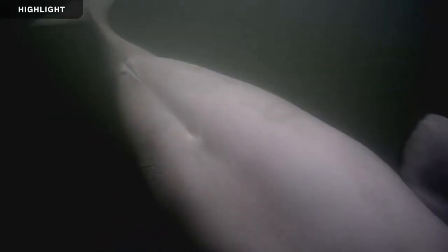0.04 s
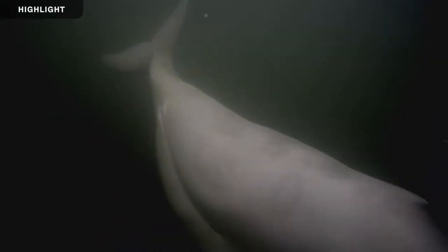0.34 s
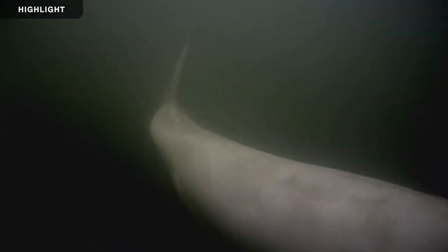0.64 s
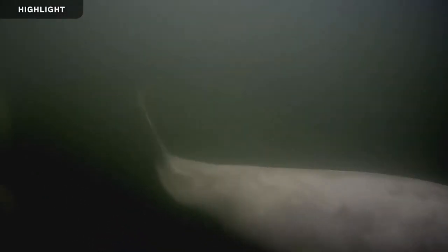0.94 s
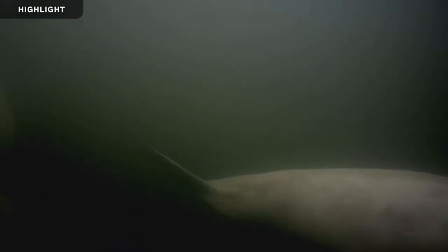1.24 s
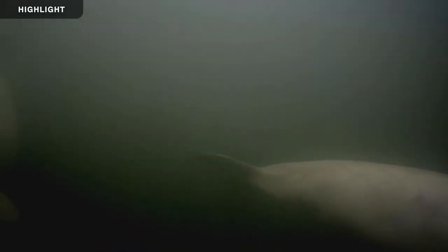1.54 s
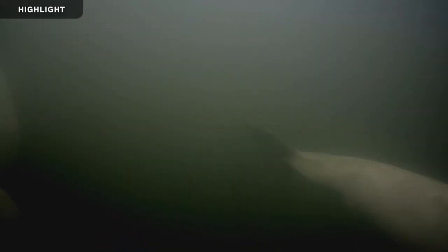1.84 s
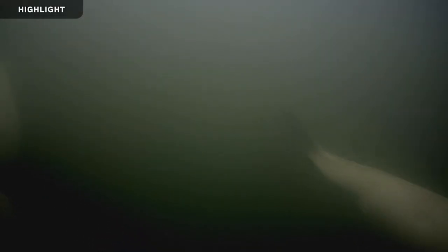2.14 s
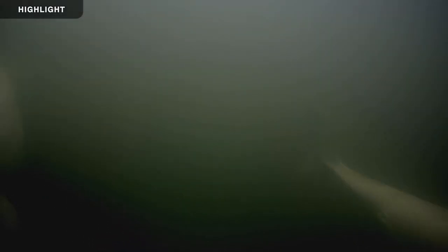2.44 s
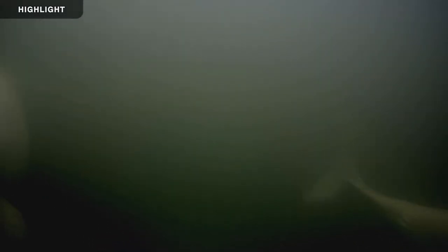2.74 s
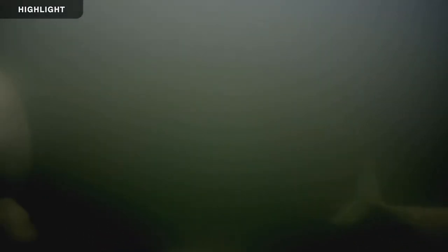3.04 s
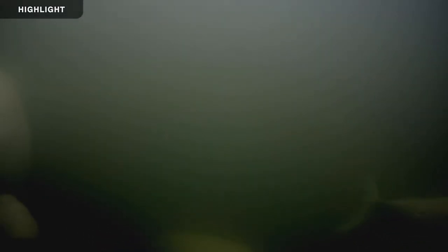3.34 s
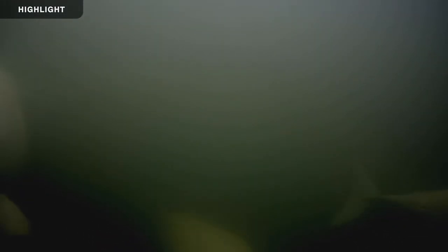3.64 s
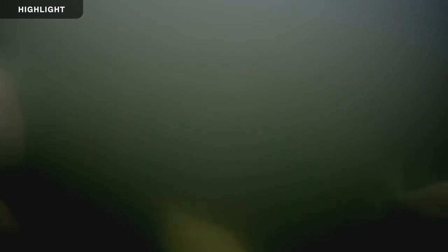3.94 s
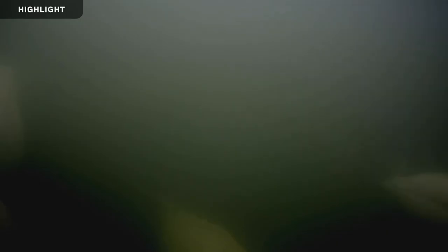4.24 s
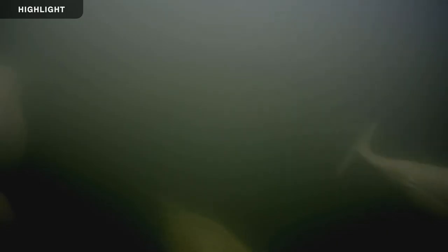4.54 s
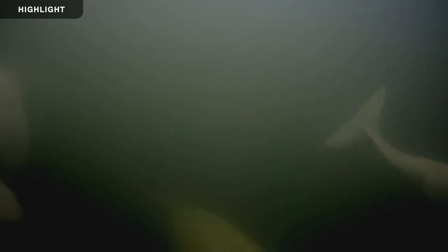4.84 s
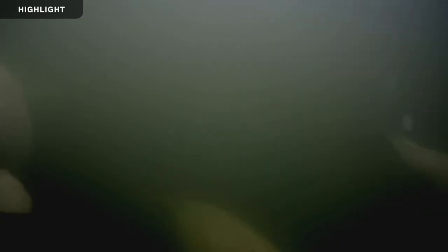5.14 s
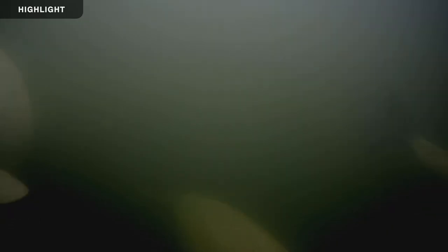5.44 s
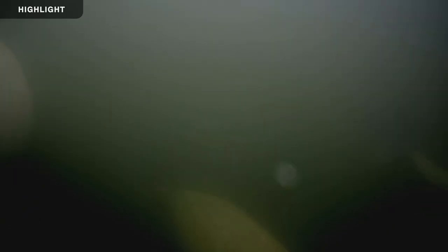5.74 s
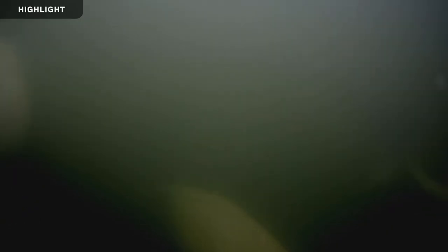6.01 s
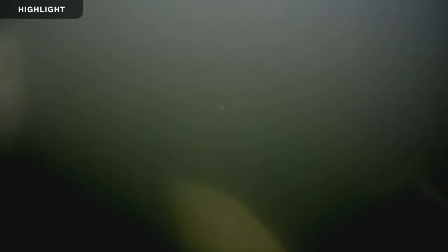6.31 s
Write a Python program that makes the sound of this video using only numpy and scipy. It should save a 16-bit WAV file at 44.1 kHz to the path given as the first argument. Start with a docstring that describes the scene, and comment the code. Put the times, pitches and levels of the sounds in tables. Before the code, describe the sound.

Several beluga whales whistle over one another through an underwater microphone, with a slight echo. A high warbling note slowly sinks while lower calls glide downward, then give way to faint creaking, a fast clicking buzz, a rising call and a short rasp. Closer and louder throughout, water rumbles past the microphone, with surges of bubbles and single plops leaning left, over a faint hiss.

```python
"""Under water among belugas, heard through a narrow-band hydrophone. Several whales call at once:
vibrating nasal lips make gliding whistles, fast clicks merge into buzzes and creaks, and hoarse
rasps and squeaks fall in between, all with a surface echo and a faint tail. Close by and louder,
water rumbles past the housing and sloshes in swarms of ringing bubbles, mostly on the left.
Large bubbles glug and tiny ones pip, over a soft hiss and a thin whine."""
import sys
import numpy as np
from scipy import signal
from scipy.fft import rfft, irfft, next_fast_len
from scipy.io import wavfile
from scipy.ndimage import uniform_filter1d

SR = 44100
rng = np.random.default_rng(int(sys.argv[2]) if len(sys.argv) > 2 else 0)


def transcribe(u):
    """Save the signal u as a 16-bit wav file named by the first command-line argument.

    u: samples, shape (n,) or (channels, n), limited to [-1, 1]; the rate is SR.
    q: integer samples, one column per channel.
    """
    v = np.clip(np.atleast_2d(u).T, -1, 1)
    q = np.round(v * 32767).astype(np.int16)
    wavfile.write(sys.argv[1], SR, q)


N = 289727
TIME = np.arange(N) / SR
CONVERTER_HZ = 16000  # the hydrophone's sample rate


def undb(db):
    """Decibels to gain."""
    return 10 ** (np.asarray(db) / 20)


def unit(x):
    """Scale to rms 1."""
    return x / np.sqrt(np.mean(x ** 2))


def curves(rows):
    """The columns of a table, joined by straight lines in time."""
    times, *columns = np.transpose(rows)
    return [np.interp(TIME, times, column) for column in columns]


def gate(rows, fade_s=0.0053):
    """Open from the first row of a table to the last, with soft edges."""
    return np.clip(np.minimum(TIME - rows[0][0], rows[-1][0] - TIME) / fade_s + 1, 0, 1)


def colour(x, points):
    """Shape with an EQ curve of (Hz, dB) points; rms 1."""
    size = next_fast_len(N)
    hz, db = np.transpose(points)
    bins = np.maximum(np.fft.rfftfreq(size, 1 / SR), 1)
    gain = undb(np.interp(np.log(bins), np.log(hz), db))
    return unit(irfft(rfft(x, size) * gain, size)[..., :N])


def filtered(x, order, hz, kind="low"):
    """Low-pass or high-pass filter."""
    return signal.sosfilt(signal.butter(order, hz, kind, fs=SR, output="sos"), x)


def wander(rate):
    """Smooth random motion that changes about `rate` times a second; rms 1."""
    hold = max(int(SR / rate), 1)
    steps = np.repeat(rng.standard_normal(N // hold + 1), hold)
    return unit(uniform_filter1d(steps, hold)[:N])


def phase_of(hz):
    """Phase in radians of a moving frequency."""
    return 2 * np.pi * np.cumsum(hz) / SR


def hoarse(phase, width_hz):
    """A tone broken up into a band of noise."""
    return unit(wander(width_hz) * np.sin(phase) + wander(width_hz) * np.cos(phase))


def decay(t, t60):
    """A fade that falls 60 dB in t60 seconds."""
    return np.exp(-np.log(1000) * t / t60)


def bubble(hz, t60, glide=0.19):
    """One bubble rings: a dying sine whose pitch climbs a little."""
    t = np.arange(int(t60 * SR)) / SR
    return np.sin(phase_of(hz * (1 + glide * t / t60))) * decay(t, t60)


def add(out, start_s, sound):
    """Mix a sound in at its start time."""
    start = max(int(start_s * SR), 0)
    part = sound[..., :max(N - start, 0)]
    out[..., start:start + part.shape[-1]] += part


# Fader ride of the hiss. Each row: time in seconds, level in dB.
HISS_LEVEL = [(0, -67.5), (1.2, -74.5), (2, -66), (3.8, -72.5)]
# Tone of the hiss. Each row: frequency in Hz, relative level in dB.
HISS_EQ = [(900, -2.5), (2100, -1.5), (3200, -7), (4000, -5.5), (6300, -7), (15000, -16)]


def noise_floor(whine_hz=3741, whine_db=-89):
    """A soft, flickering hiss that swells and fades with the calls, and a thin whine."""
    hiss = colour(rng.standard_normal(N), HISS_EQ) * undb(curves(HISS_LEVEL)[0] + wander(22))
    whine = hoarse(2 * np.pi * whine_hz * TIME, width_hz=20) * undb(whine_db)
    return hiss + whine


# Fader ride of the rumble. Each row: time in seconds, level in dB.
RUMBLE_LEVEL = [(0, -36.5), (1.1, -34), (2.2, -36.5), (3.48, -37), (3.56, -31), (4.5, -34), (6.25, -35.5),
                (6.5, -32.5)]
# Tone of the rumble. Each row: frequency in Hz, relative level in dB.
RUMBLE_EQ = [(8, 3), (85, 1), (170, -8.5), (320, -31.5), (900, -45), (1700, -78)]


def rumble(crossover_hz=170, apart_db=-9, surge_db=2.0, lean_db=1):
    """Water flows round the housing: long waves press on both sides alike, short ones unevenly."""
    shared = filtered(colour(rng.standard_normal(N), RUMBLE_EQ), 2, crossover_hz)
    apart = colour(rng.standard_normal((2, N)), RUMBLE_EQ)
    eddies = filtered(apart, 2, crossover_hz, "high")[::-1]  # left and right swapped
    lean_left = undb([[lean_db / 2], [-lean_db / 2]])
    sides = (shared + undb(apart_db) * apart + eddies) * lean_left
    return sides * undb(curves(RUMBLE_LEVEL)[0] + surge_db * wander(9))


# Tone of the bubble swarm. Each row: frequency in Hz, relative gain in dB.
SWARM_EQ = [(90, -8.5), (220, -5.5), (700, -7), (1200, -13), (1650, 5)]


def swarm(count=2400, low_hz=170, high_hz=1200, cycles=20, spread_db=2.9):
    """Many small bubbles, mostly weak with a few that stand out, each ringing for a few cycles."""
    out = np.zeros(N)
    for when, pitch, weakness in rng.random((count, 3)):
        hz = low_hz * (high_hz / low_hz) ** pitch
        gain = undb(-spread_db * np.log(weakness + 0.0035))
        add(out, when * N / SR, gain * bubble(hz, cycles / hz))
    return colour(out, SWARM_EQ)


# Surges of bubbles. Each row: start in seconds, length in seconds, level in dB before panning.
SURGES = [(0.959, 0.24, -40.5), (1.336, 0.38, -44.5), (1.614, 0.018, -48.5), (2.392, 0.19, -41.5),
          (2.694, 0.34, -45), (3.113, 0.23, -41.5), (3.791, 0.31, -41), (4.137, 0.13, -37),
          (5.71, 0.28, -47.5)]


def slosh(calm_db=-52.5, attack_s=0.046, release_s=0.11, left_db=4, right_db=-5, muffle_hz=1280):
    """Bubbles churn against the housing, mostly on the left; each surge swells, holds and ebbs."""
    power = undb(calm_db) ** 2
    for start, length, db in SURGES:
        swell = np.clip((TIME - start) / attack_s, 0, 1)
        ebb = np.exp(-np.maximum(TIME - start - length, 0) / release_s)
        power = power + (undb(db) * swell * ebb) ** 2
    sides = np.array([swarm() * undb(left_db), swarm() * undb(right_db)])
    return filtered(sides * np.sqrt(power), 10, muffle_hz)


# Large bubbles. Each row: start in seconds, pitch in Hz, level in dB, side of the housing.
GLUGS = [(0.587, 402, -32, "left"), (1.0529, 573, -23, "left"), (1.122, 873, -28, "left"),
         (1.204, 830, -32.5, "left"), (1.3755, 537, -26.5, "left"), (1.4388, 217, -21, "left"),
         (1.5341, 642, -21.5, "left"), (1.652, 710, -27.5, "left"), (1.664, 642, -21.5, "left"),
         (1.986, 262, -28, "left"), (2.088, 931, -22, "right"), (2.563, 222, -27, "left"),
         (3.613, 845, -20.5, "left"), (3.668, 189, -18, "left"), (3.9054, 473, -24, "left"),
         (3.947, 523, -25.5, "left"), (3.988, 224, -24.5, "left"), (4.177, 752, -24.5, "left"),
         (4.21, 865, -34, "left"), (4.237, 450, -20, "left"), (4.268, 230, -23.5, "left"),
         (4.307, 1124, -29.5, "left"), (5.118, 501, -25, "left"), (6.179, 826, -31, "left"),
         (6.5117, 330, -23, "left")]


def glugs(t60_at_300_hz=0.072, damping_power=1.27, churn_db=-14, churn_t60=0.12, far_side_db=-20):
    """Large bubbles break loose: the biggest plop, the smaller just slap; a short churn follows each."""
    out, t = np.zeros((2, N)), TIME[:SR // 4]
    for start, hz, db, side in GLUGS:
        pan = undb([db, db + far_side_db] if side == "left" else [db + far_side_db, db])
        plop = bubble(hz, t60_at_300_hz * (300 / hz) ** damping_power)
        churn = hoarse(2 * np.pi * hz * TIME, width_hz=hz)[:len(t)] * decay(t, churn_t60)
        add(out, start, np.outer(pan, plop))
        add(out, start, np.outer(pan, undb(churn_db) * churn))
    return filtered(out, 10, hz=1400)


# Clear tiny bubbles. Each row: start in seconds, pitch in Hz, peak level in dB.
PIPS = [(0.578, 1760, -54), (1.555, 2410, -62.5), (3.549, 2200, -57.5), (3.875, 2230, -57),
        (6.203, 2830, -56)]


def pips(t60=0.03, tick_count=45, low_hz=1700, high_hz=5500, tick_db=-57):
    """Tiny bubbles pop one at a time, high and short: a few clear ones among scattered faint ticks."""
    out = np.zeros(N)
    for start, hz, db in PIPS:
        add(out, start, bubble(hz, t60) * undb(db))
    for when, pitch, strength in rng.random((tick_count, 3)):
        hz = low_hz * (high_hz / low_hz) ** pitch
        add(out, when * N / SR, bubble(hz, t60 / 2) * strength * undb(tick_db))
    return out


def reverberation(calls, t60=0.85, wet_db=-17, echo_s=0.014, echo_db=-11):
    """The surface returns an inverted echo that beats with each glide; the bottom scatters a tail."""
    t = TIME[:SR // 2]
    scatter = rng.standard_normal(len(t)) * decay(t, t60)
    tail = signal.fftconvolve(calls, scatter / np.linalg.norm(scatter))[:N]
    echo = -np.interp(TIME - echo_s, TIME, calls, left=0)
    return calls + undb(echo_db) * echo + undb(wet_db) * tail


def converter(calls, image_db=-14, smoothing_hz=12000):
    """The hydrophone's slow converter adds an image of every call, mirrored about half its rate."""
    image = 2 * calls * np.cos(2 * np.pi * CONVERTER_HZ * TIME)
    return calls + undb(image_db) * filtered(image, 2, smoothing_hz)


# Creaky spurts. Each row: start in seconds, length in seconds.
CREAKS = [(4.169, 0.16), (4.342, 0.018), (4.4, 0.019), (4.457, 0.027), (4.504, 0.028), (4.577, 0.023),
          (4.637, 0.062)]


def creaks(rate_hz=690, centre_hz=5600, width_hz=1500, jitter=0.014, spread=0.16, sag_per_s=0.31):
    """Unsteady spurts of very fast pulses ring one broad resonance; each has its own rate and sags."""
    out = np.zeros(N)
    for (start, length), chance in zip(CREAKS, rng.random(len(CREAKS))):
        size = int(length * SR)
        bend = 1 + spread * (chance - 0.5) + jitter * wander(100) - sag_per_s * TIME
        phase = phase_of(rate_hz * bend[:size])
        spurt = sum(np.cos(k * phase) / (1 + ((k * rate_hz - centre_hz) / width_hz) ** 2)
                    for k in range(2, 14))
        add(out, start, unit(spurt) * signal.windows.tukey(size) * undb(-73))
    return out


# Arch of the raspy call. Each row: time in seconds, centre in Hz, level in dB.
RASP = [(6.01, 2623, -74), (6.17, 4340, -74.5), (6.33, 3920, -72), (6.4, 3250, -69), (6.57, 2780, -75)]


def rasp(width_hz=900, wobble=0.046, grain_db=3):
    """One hoarse, grainy call: a band of noise that arches up and back down."""
    hz, db = curves(RASP)
    band = hoarse(phase_of(hz * (1 + wobble * wander(120))), width_hz)
    return band * undb(db + grain_db * wander(120)) * gate(RASP)


# Squeaks and snaps. Each row: start and length in seconds, centre and width in Hz, level in dB.
SQUEAKS = [(0.491, 0.0088, 4070, 2000, -63), (0.917, 0.0083, 6370, 7500, -59.5),
           (1.598, 0.24, 1934, 604, -68), (1.578, 0.2, 7850, 600, -70.5), (3.69, 0.073, 8030, 1240, -72.5),
           (3.784, 0.062, 8440, 1210, -69), (4.018, 0.078, 8700, 500, -66)]


def squeaks():
    """Short swells of hoarse tone; the briefest and widest sound like snaps."""
    out = np.zeros(N)
    for start, length, centre_hz, width_hz, db in SQUEAKS:
        size = int(length * SR)
        band = hoarse(2 * np.pi * centre_hz * TIME, width_hz)[:size]
        add(out, start, band * np.sqrt(np.hanning(size)) * undb(db))
    return out


# Run of the click train. Each row: time in seconds, clicks per second, level in dB.
BUZZ = [(4.73, 490, -67.5), (4.95, 450, -69.5), (5.35, 610, -69), (5.62, 470, -67.5), (5.72, 69, -77),
        (5.8, 560, -74.5), (6.0, 600, -71), (6.1, 77, -78)]
# Tone of the clicks. Each row: frequency in Hz, relative gain in dB.
CLICK_EQ = [(1500, -16.5), (6500, -13), (8500, -17), (10000, -28)]


def buzz(jitter=0.012, scatter_s=0.0007, scatter_db=-5, throb_db=2):
    """Echolocation clicks, so fast they merge into a throbbing buzz that arches up and runs down."""
    rate, db = curves(BUZZ)
    cycles = np.cumsum(rate * (1 + jitter * wander(120))) / SR
    direct = unit(np.sinc((cycles - np.round(cycles)) * SR / rate))
    since_click_s = (cycles % 1) / rate
    scatter = unit(rng.standard_normal(N) * np.exp(-since_click_s / scatter_s))
    clicks = (direct + undb(scatter_db) * scatter) / np.sqrt(rate)
    return colour(clicks, CLICK_EQ) * undb(db + throb_db * wander(30)) * gate(BUZZ, fade_s=0.24)


def flicks(rows):
    """Each flick arches the pitch up and back; returns the rise in Hz and the arch's height, 0-1."""
    rise, height = np.zeros(N), np.zeros(N)
    for start, length, rise_hz in rows:
        arch = np.sin(np.pi * np.clip((TIME - start) / length, 0, 1))
        rise += rise_hz * arch
        height += arch
    return rise, height


# Resonances that light up passing overtones. Each row: centre in Hz, width in Hz, boost in dB.
RESONANCES = [(8300, 1600, 8), (14300, 900, 14)]


def whistle(contour, second_db, upper_db, tremor_hz, flick_rows=(), waver_hz=9, swell_db=2.2,
            flutter_db=1.5, fading_db=3.0, rolloff_db=2.5, ceiling_hz=9500, thinning_db=11):
    """Vibrating nasal lips: a trembling pitch whose harmonics fade in and out as sound paths shift."""
    hz, db = curves(contour)
    rise_hz, arch = flicks(flick_rows)
    hz = uniform_filter1d(hz + rise_hz, SR // 200) + waver_hz * wander(24)
    # the tone falters and turns rough where the pitch leaps to another register
    leap_per_s = np.gradient(np.log(hz)) * SR
    steadiness = 1 / (1 + (leap_per_s / 7) ** 2)
    break_hz = 0.0276 * hz * (1 - steadiness)
    hz = hz + (tremor_hz + break_hz) * wander(230)
    db = db + swell_db * wander(24) + flutter_db * wander(160)
    envelope = gate(contour) * np.sqrt(steadiness) * undb(db)
    on = envelope > 0
    phase, out = phase_of(hz[on]), np.zeros(N)
    out[on] = np.sin(phase) * undb(-thinning_db * arch[on])  # the fundamental dips in a flick
    for k in range(2, 7):
        overtone_hz = k * hz[on]
        # the upper overtones die out above a ceiling, so a falling call grows richer
        top_cut = 1 + (overtone_hz / ceiling_hz) ** 10
        gain = undb(second_db) if k == 2 else undb(upper_db - rolloff_db * (k - 0.5)) / top_cut
        lift_db = sum(boost_db * np.exp(-((overtone_hz - centre) / width) ** 2)
                      for centre, width, boost_db in RESONANCES)
        shimmer = undb(lift_db + fading_db * wander(25)[on])
        out[on] += gain * steadiness[on] ** 2 * shimmer * np.sin(k * phase) * (overtone_hz < CONVERTER_HZ)
    return out * envelope


# Whistle shapes, in order of entry; THIN_RISE is only a faint line rising above 14 kHz, # which the converter
# mirrors into a fall below 2 kHz. Each row: time in seconds, pitch in Hz, level in dB.
HELD = [(0.0, 5790, -64.5), (0.23, 5870, -58), (0.35, 5810, -64), (0.52, 5830, -66), (0.77, 5590, -70)]
TRILL = [(0.0, 3930, -69.5), (0.33, 4015, -68.5), (0.43, 3840, -72)]
LOW_GLIDE = [(0.0, 1604, -66), (0.23, 1262, -67.5)]
CHIRP = [(1.165, 7700, -62), (1.195, 6370, -63), (1.215, 5220, -74), (1.31, 4500, -78.5), (1.49, 4430, -78)]
FIRST_FALL = [(1.76, 2400, -69), (1.9, 2355, -60), (2.04, 2115, -61), (2.055, 1905, -65),
              (2.14, 1483, -57.5), (2.2, 1280, -68)]
WARBLE = [(1.775, 8000, -63), (1.794, 7240, -54.5), (1.95, 7140, -60), (2.02, 6400, -58.5),
          (2.3, 6235, -52), (2.57, 6180, -56), (2.62, 6010, -51.5), (2.78, 5760, -60.5)]  # the long lead whistle, sinking step by step
COMPANION = [(2.17, 6200, -81), (2.19, 5850, -61.5), (2.55, 5880, -64), (2.7, 5690, -69), (2.94, 5560, -59),
             (3.07, 5510, -56.5), (3.12, 5200, -77)]
SECOND_FALL = [(2.675, 2640, -66), (2.72, 2692, -52.5), (2.86, 2570, -52), (2.873, 2280, -52.5),
               (3.05, 1935, -57.5), (3.06, 1636, -61), (3.14, 1406, -56.5)]
SWOOP = [(2.96, 8300, -62), (3.03, 6750, -65)]
THIRD_FALL = [(3.08, 2430, -66), (3.2, 2280, -76), (3.28, 2145, -66), (3.35, 2020, -61.5),
              (3.49, 1790, -65), (3.57, 1380, -66)]
THIN_RISE = [(4.15, 14300, -71), (4.31, 15000, -72)]
RISE = [(4.72, 2170, -65.5), (4.82, 2126, -63), (4.88, 2256, -59.5), (5.068, 2270, -62), (5.08, 2630, -74),
        (5.22, 2817, -66), (5.5, 2814, -72)]
ANSWER = [(5.16, 2500, -69), (5.335, 2420, -68.5), (5.35, 2110, -69.5), (5.45, 1820, -67.5)]
LAST_CALL = [(6.37, 2610, -69), (6.42, 2580, -58), (6.57, 2365, -67)]
# Upward flicks of the warble. Each row: start in seconds, length in seconds, rise in Hz.
WARBLE_FLICKS = [(1.865, 0.084, 725), (2.047, 0.077, 386), (2.198, 0.071, 502)]
PURE = (-19.5, -30)  # an almost pure voice: second and upper harmonics in dB
CLEAR, ROUGH = 8, 28  # pitch tremor in Hz
# Voices around the warble. Each row: shape, second harmonic in dB, upper harmonics in dB before
# roll-off, pitch tremor in Hz.
WHISTLES = [(HELD, *PURE, CLEAR), (TRILL, -2.4, -11, ROUGH), (LOW_GLIDE, -13, -15.5, ROUGH),
            (COMPANION, *PURE, CLEAR), (FIRST_FALL, -4, -18, CLEAR), (SWOOP, *PURE, ROUGH),
            (THIRD_FALL, -6, -18, CLEAR), (THIN_RISE, *PURE, ROUGH), (ANSWER, 0, -11, CLEAR),
            (LAST_CALL, -3, -17, CLEAR), (CHIRP, -7, -14, ROUGH), (SECOND_FALL, -13, -12, CLEAR),
            (RISE, -1.5, -9, CLEAR)]


def whistle_chorus():
    """Several belugas whistle across each other, around one long warbling call."""
    warble = whistle(WARBLE, *PURE, CLEAR, flick_rows=WARBLE_FLICKS)
    return warble + sum(whistle(*voice) for voice in WHISTLES)


def scene():
    """The whales in the middle, the water all around."""
    calls = whistle_chorus() + buzz() + creaks() + rasp() + squeaks()
    whales = converter(reverberation(calls))
    return whales + noise_floor() + rumble() + slosh() + glugs() + pips()


def record(dry, top_hz=15050):
    """A steep low-pass cuts off the highest treble."""
    return signal.sosfilt(signal.ellip(10, 0.2, 80, top_hz, fs=SR, output="sos"), dry)


dry = scene()
out = record(dry)
transcribe(out)
```